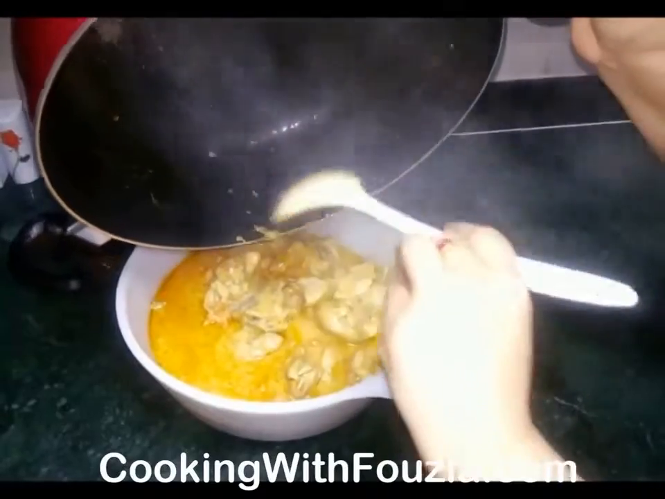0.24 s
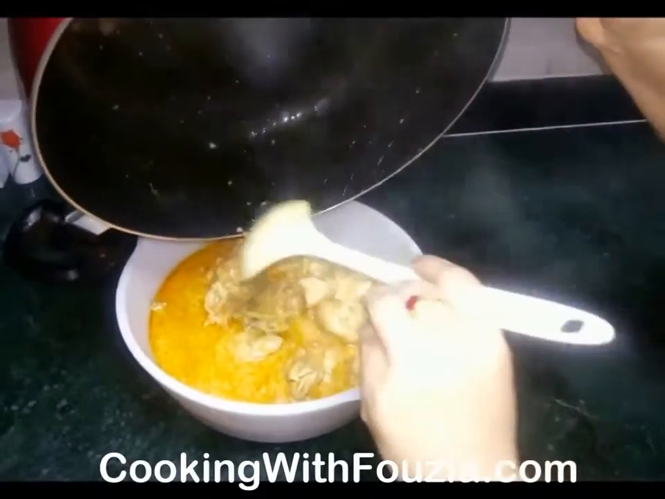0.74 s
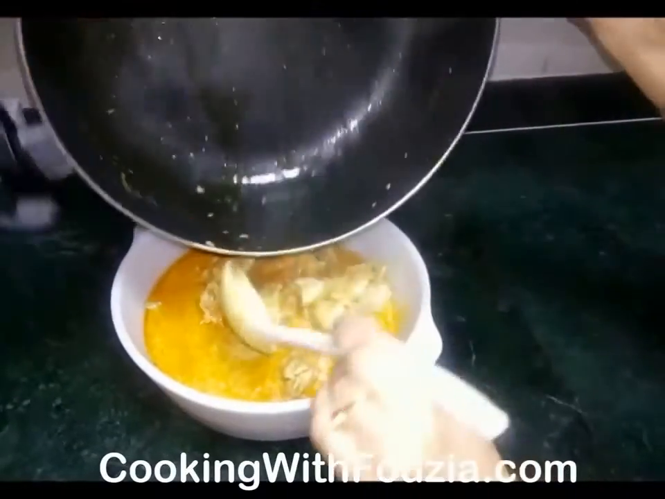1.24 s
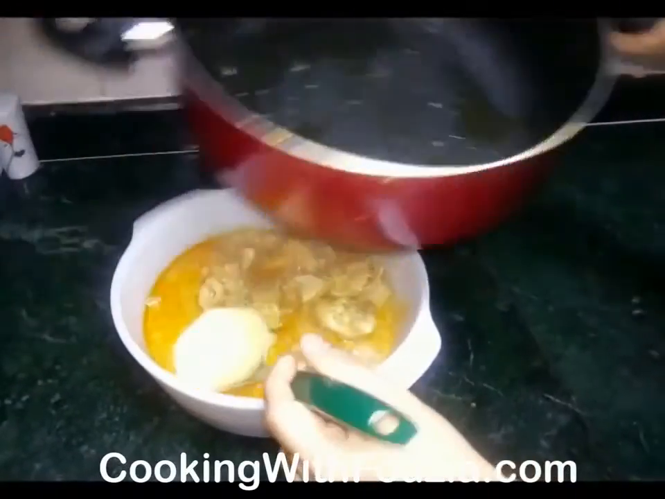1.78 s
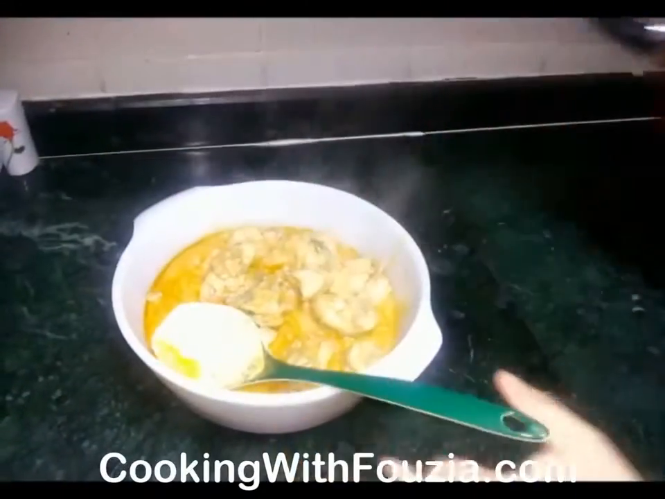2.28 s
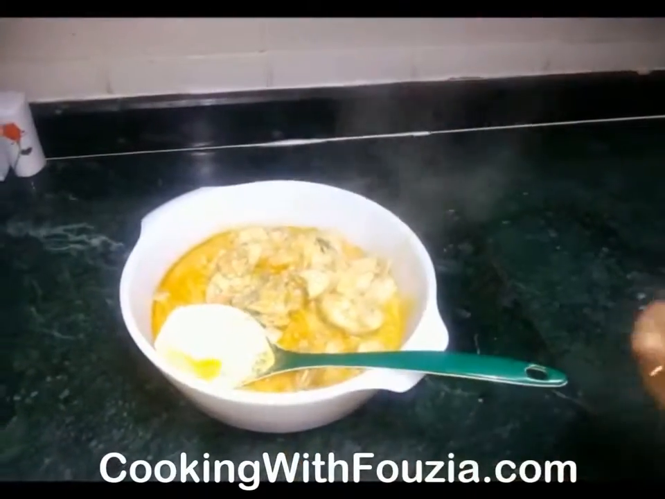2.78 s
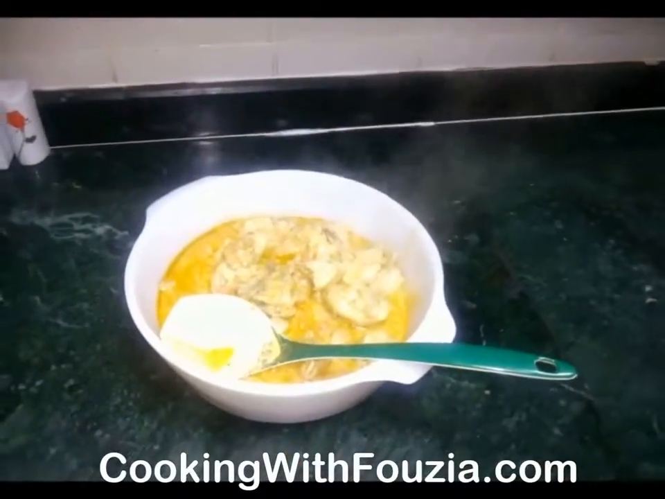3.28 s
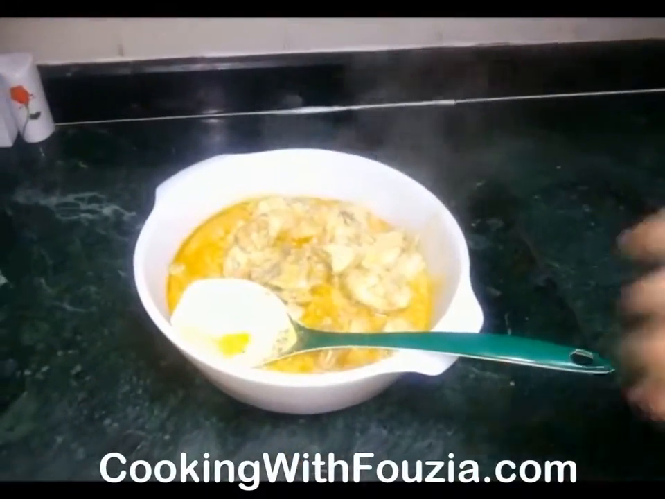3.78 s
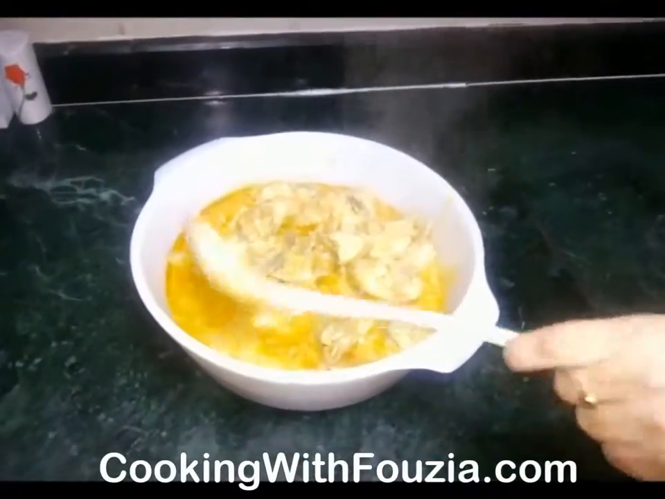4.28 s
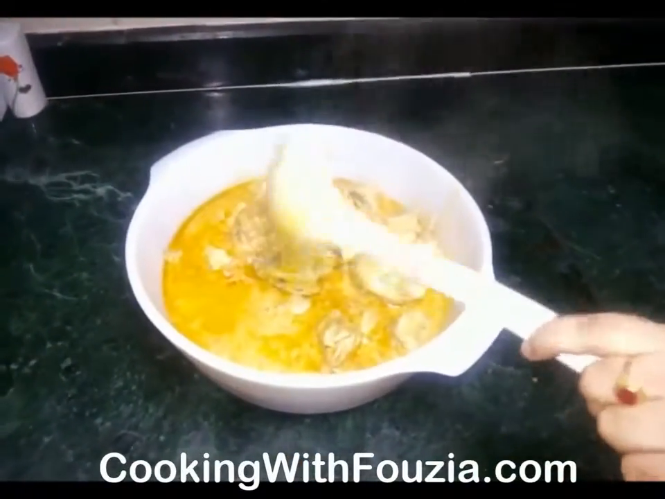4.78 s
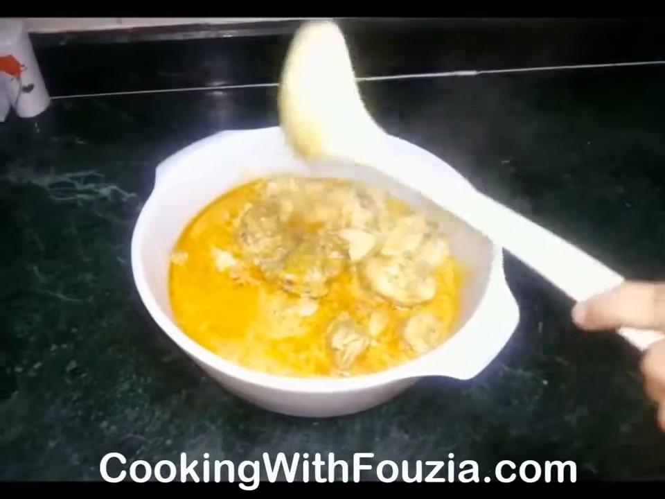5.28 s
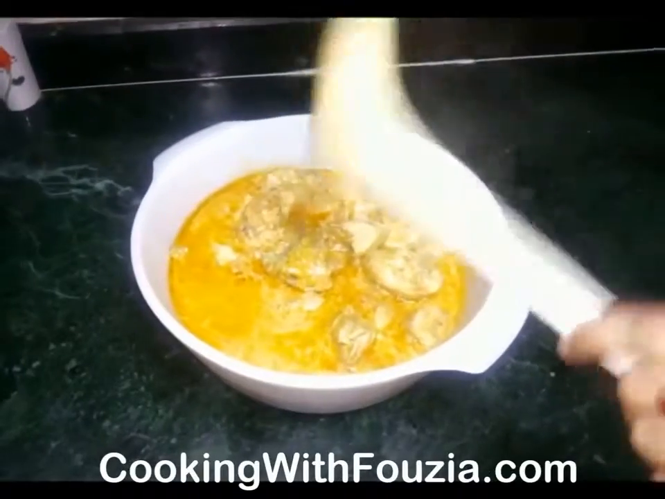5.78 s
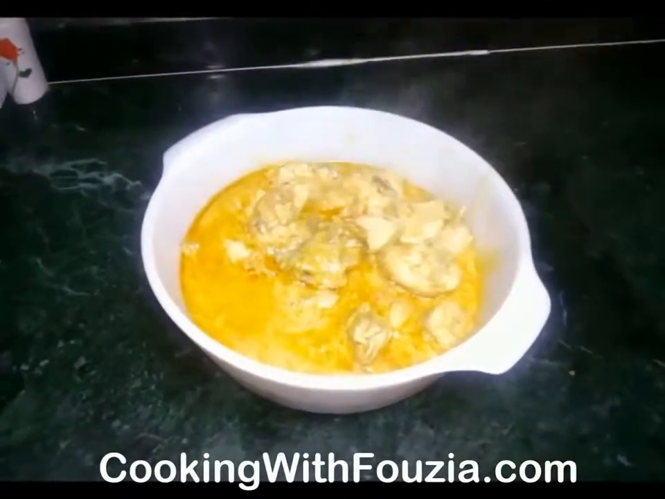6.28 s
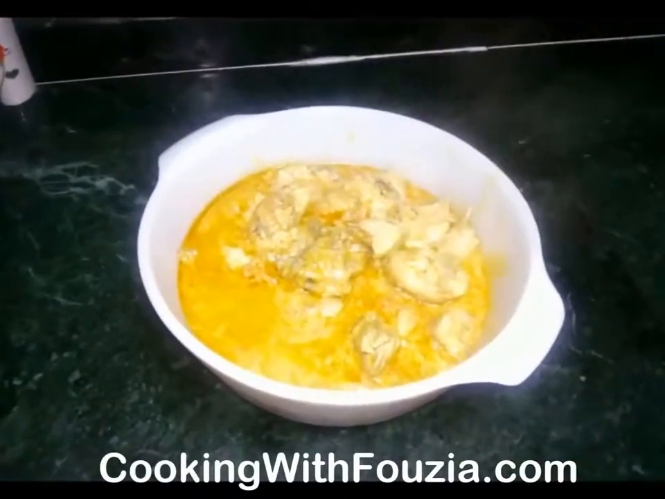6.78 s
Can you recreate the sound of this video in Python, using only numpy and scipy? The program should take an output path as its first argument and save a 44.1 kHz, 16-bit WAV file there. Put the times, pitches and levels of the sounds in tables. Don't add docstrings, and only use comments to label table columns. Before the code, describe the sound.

Close metallic kitchen knocks in a tiled room over a steady fan rush: pan scrape, loud blow, bowl rim clanks, dull thuds, final bright clatter.

```python
import sys
import numpy as np
from scipy import signal
from scipy.fft import rfft, irfft, next_fast_len
from scipy.io import wavfile
from scipy.ndimage import uniform_filter1d, map_coordinates

SR = 44100
rng = np.random.default_rng(int(sys.argv[2]) if len(sys.argv) > 2 else 0)


def generate_wav(sig):
    pcm = np.round(np.clip(np.atleast_2d(sig).T, -1, 1) * 32767).astype(np.int16)
    wavfile.write(sys.argv[1], SR, pcm)


def volts_from_db(level):
    exponent = np.asarray(level, float) / 20
    return 10 ** exponent


N = 310905

HUM_HZ = 767
BASS_HZ = 93
TOP_HZ = 15800
AIR_DB = -41.5

# f/Hz, level/dB (per Hz)
AIR = [(25, -21), (50, -27), (79, -16), (99, -10), (160, -8), (250, 0), (500, -2.5), (1000, -4),
       (1900, -9.5), (2400, -18.5), (5500, -26.5), (7200, -31.5), (12000, -28.5), (15700, -28.5)]
# t/s, level/dB
HUM = [(0, -45.5), (1.6, -53), (2.4, -43.5), (2.55, -42), (3, -48), (4.9, -45.5), (6.5, -44.5),
       (6.75, -46.5), (7.05, -61)]
# t/s, level/dB (over the rush)
SIZZLE = [(0, 30), (.4, 3), (1.7, 2.5), (2.1, 10), (3.2, 4), (3.6, 1.5), (5.5, 3), (6.3, 6.5), (7.05, 9.5)]
# f/Hz, t60/s
KITCHEN = [(150, 0.93), (450, 0.48), (2000, 0.41), (5000, 0.41), (10000, 0.29), (16000, 0.49)]
# t/s, level/dB
WALLS = [(0.01, 9), (0.018, 2), (0.03, -1.5), (0.044, -37)]

# t/s, level/dB (peak), hardness/dB, rise/s
SCRAPE = [
    (.001, -14, -1, 0.0011),
    (.016, -30.5, -5, 0.0035),
    (.033, -23, -9, 0.0038),
    (.052, -28, -13, 0.0064),
]
# t/s, level/dB, hardness/dB, rise/s
RUB = [
    (.072, -21.5, 0, 0.01),
    (.086, -32, 0, 0.0055),
    (.102, -27, 2, 0.0016),
    (.113, -23.5, 0.25, 0.0052),
    (.126, -31, 0.24, 0.0081),
]
# t/s, level/dB, hardness/dB, rise/s
SLIP_OFF = [
    (.142, -22, 1, .011),
    (.179, -32, 11, 0.0023),
]
# t/s, level/dB, hardness/dB, rise/s
STRIKE = [
    (.4655, -4, -8, 0.0016),
]
# t/s, level/dB, hardness/dB, rise/s
SHIVER = [
    (.489, -34, 1, 0.0035),
    (.504, -14.5, -1, 0.0015),
    (.521, -18, -1, 0.002),
    (.548, -25, 7, 0.0032),
]
# t/s, level/dB, hardness/dB, rise/s
TINK = [
    (1.012, -49, 0, 0.0017),
]
# t/s, level/dB, hardness/dB, rise/s
TICKS = [(1.83, -37.5, 23, 0.0023), (2.443, -41, 0, 0.0038), (2.585, -47, -1.5, 0.0013),
         (2.92, -47, -2, 0.021), (3.04, -55, 4, 0.0033), (3.44, -56, 8, 0.0027), (5.43, -54, -12, 0.0049),
         (5.535, -57, 5, .003), (5.635, -48, 2, 0.018), (5.75, -55, -4, 0.0054), (6.03, -67, -11, 0.011),
         (6.215, -41.5, -6, 0.0087)]
# t/s, level/dB, hardness/dB, rise/s
TOUCH = [
    (2.7665, -37, -6, 0.00029),
    (2.785, -49, 3, 0.0079),
]
# t/s, level/dB, hardness/dB, rise/s
KNOCK = [
    (1.1935, -13, -2.5, 0.0028),
    (1.204, -21, -7, 0.0039),
]
# t/s, level/dB, hardness/dB, rise/s
SET_DOWN = [
    (1.896, -23, 2, 0.0034),
    (1.906, -26, .3, 0.00095),
    (1.949, -42, .3, 0.0016),
]
# t/s, level/dB, hardness/dB, rise/s
ROCK = [
    (2.154, -28, 2, 0.0021),
    (2.179, -28.5, -2, 0.0014),
    (2.214, -53, -9, 0.002),
]
# t/s, level/dB, hardness/dB, rise/s
SETTLE = [
    (2.332, -26.5, -5, 0.0014),
    (2.346, -38, -4, 0.0038),
    (2.364, -32, -1, 0.0071),
    (2.389, -53, 5, 0.0033),
]
# t/s, level/dB, hardness/dB, rise/s
NUDGES = [
    (3.34, -40, 0.33, .019),
    (3.725, -36, .3, .008),
]
# t/s, level/dB, hardness/dB, rise/s
BUMP = [
    (3.879, -6.5, -3.5, 0.011),
]
# t/s, level/dB, hardness/dB, rise/s
DRAG = [
    (3.935, -19.5, -3.5, 0.009),
    (3.958, -13, 1.5, 0.013),
    (3.976, -20, 2.5, 0.0066),
    (3.995, -20.5, -5, 0.011),
    (4.2, -36.5, 33, 0.029),
    (4.25, -34, -2, 0.016),
]
# t/s, level/dB, hardness/dB, rise/s
CLINK = [
    (4.038, -11.5, 6.1, 0.011),
]
# t/s, level/dB, hardness/dB, rise/s
LIFT = [
    (4.093, -15, -5.5, 0.007),
    (4.110, -10.5, -4.5, 0.0083),
    (4.133, -20, -1, 0.0062),
    (4.147, -25.5, 4, 0.0043),
    (4.215, -28.5, -18, 0.01),
]
# t/s, level/dB, hardness/dB, rise/s
THUDS = [
    (4.306, -22, -1.5, 0.0028),
    (4.325, -26.5, -11, 0.0029),
]
# t/s, level/dB, hardness/dB, rise/s
THUMP = [
    (4.369, -21, -15, 0.014),
    (4.45, -32, -16, 0.0072),
]
# t/s, level/dB, hardness/dB, rise/s
TAP = [
    (4.527, -25.5, 8.2, 0.002),
    (4.538, -25, 3.3, 0.0062),
    (4.58, -49, 6, 0.004),
]
# t/s, level/dB, hardness/dB, rise/s
LAST_TAPS = [
    (4.713, -26.5, 2, 0.014),
    (4.755, -29.5, -8, 0.0059),
    (4.812, -31.5, -10, 0.0071),
]
# t/s, level/dB, hardness/dB, rise/s
CLATTER = [
    (6.8775, -5, 4.7, 0.0013),
]
# t/s, level/dB, hardness/dB, rise/s
RATTLE = [
    (6.892, -20, 12, 0.0026),
    (6.906, -22, 16, 0.0032),
    (6.928, -26, -1, 0.0024),
    (6.938, -19.5, 8, 0.0017),
]
# t/s, level/dB, hardness/dB, rise/s
REBOUND = [
    (6.918, -12.5, 2, 0.0036),
    (6.934, -27, -9, 0.0029),
    (6.947, -29, -12, 0.0028),
    (6.995, -31, -2, 0.005),
]

# f/Hz, level/dB, t60/s
SCRAPE_MODES = [(473, 7, 0.39), (770, -11, 0.33), (1145, -4.5, 0.5), (1336, 2, 0.11), (1560, 15, 0.053),
                (1860, 8, 0.13), (2260, 5, 0.093), (2600, -4.5, 0.39), (3413, -26, 0.3), (4420, 2, 0.2),
                (4694, -2, 0.34), (5400, 0, 0.29), (5740, -2, 0.22), (6100, -2, 0.13), (6842, -5, 0.14),
                (8300, -21, 0.18)]
# f/Hz, level/dB, t60/s
RUB_MODES = [(970, -3, 0.21), (1144, -7, 0.36), (1720, 2, 0.093), (1833, 9, 0.098), (2350, -3, 0.11),
             (3470, -18, 0.28), (4180, -16, .2), (5276, -17, 0.24), (5787, -30, 0.16), (6500, -16, .15)]
# f/Hz, level/dB, t60/s
SLIP_OFF_MODES = [ (466, 5, 0.69), (1146, -3, 0.62), (1770, 2, 0.22), (2584, -10, 0.4), (3326, -0.5, 0.19),
                  (4130, -8, 0.53), (4500, -2, 0.2), (4740, -21, .25), (5640, -21, 0.28), (6400, -16, 0.33),
                  (8150, -12, 0.11)]
# f/Hz, level/dB, t60/s
STRIKE_MODES = [(474, -16, .45), (781, -3, .45), (355, -8, .12), (1148.5, -5, 1.5), (1369, -6, .6),
                (1755, -16, .3), (1860, -12, .3), (1300, -1, .06), (1965, 11, .045), (1947, -10, .35),
                (2250, -16, .3), (2764, -9, .4), (4595, -9, .25), (5840, -10, .3), (2335, -10, .1),
                (2638, -12, .25), (2820, -7, .4), (3445, -6, .22), (4075, -7, .3), (4382, -9, .36),
                (4545, -7, .34), (4877, -11, .28), (5033, -11, .36), (5200, -10, .36), (5400, -12, .3),
                (5776, -6, .25), (6272, -12, .23), (6815, -9, .18), (7752, -22, .25), (8134, -25, .25)]
# f/Hz, level/dB, t60/s
SHIVER_MODES = [(470.3, -2, 0.49), (756, 6.5, 0.19), (1148.5, -13, 0.4), (1327, 3, 0.26), (1352, 6.5, 0.41),
                (1720, 6, 0.17), (1900, 6.5, 0.18), (2320, -15, 0.43), (2800, -4, 0.46), (4000, -16, 0.26),
                (4500, 0, 0.31), (5210, -4, 0.33), (5800, -12, 0.18), (6800, -23, 0.12)]
# f/Hz, level/dB, t60/s
TICK_MODES = [ (5900, -1, .1), (6900, -1, 0.17), (7600, -3, .2), (8400, -3, 0.093)]
# f/Hz, level/dB, t60/s
TOUCH_MODES = [(1825, 11, 0.033), (2050, -13, 0.091), (4180, -11, .08), (4750, -6, .1), (5500, -4, .1)]
# f/Hz, level/dB, t60/s
KNOCK_MODES = [(364, -11, .18), (402, 2, .085), (451, -19, .3), (474, 0, .34), (490, -13, .22),
               (778, -16, .36), (1369, -8, .6), (1914, -12, .1), (2595, -25, .3), (2756, -29, .35),
               (2828, -16, .33), (2850, -15, .1), (3865, -15, .22), (4356, -13, .25), (4694, -18, .3),
               (4890, -18, .2), (5044, -16, .32), (5399, -17, .25), (4379, -14, .08), (5481, -22, .3),
               (5690, -25, .3), (6826, -22, .28), (7462, -17, .28), (7693, -28, .2), (9281, -29, .2),
               (9512, -28, .13)]
# f/Hz, level/dB, t60/s
SET_DOWN_MODES = [(467, 0, 0.13), (620, 0.5, 0.066), (1070, -10, .3), (1112, -12.5, 1), (1660, 1, 0.12),
                  (2045, 7, 0.075), (2720, 5, 0.084), (2980, -16, 0.41), (3120, 7.5, 0.06),
                  (4920, -4, 0.075)]
# f/Hz, level/dB, t60/s
ROCK_MODES = [(464, 0, 0.16), (1097, -3.5, 0.48), (1176, 7, 0.076), (1140, -5, .3), (1225, 1, 0.11),
              (2100, -3, 0.15), (3186, 0.5, 0.25), (5420, -8, 0.11), (6800, -33, .15)]
# f/Hz, level/dB, t60/s
SETTLE_MODES = [(455, -5.5, 0.13), (1620, 5, 0.069), (1913, -1.5, 1), (2950, 4.5, 0.091), (3100, -13, 0.16),
                (3930, -2, 0.1), (4500, -8, .1)]
# f/Hz, level/dB, t60/s
NUDGE_MODES = [(432, 5, 0.1), (1160, -19, 0.11)]
# f/Hz, level/dB, t60/s
BUMP_MODES = [(464, 10.5, 0.17), (790, -1, 0.2), (1145, -1, 0.5), (1450, -4, 0.28), (1670, -9, 0.17),
              (1870, -8, 0.36), (1940, -3, 0.27), (2611, -20, 0.13), (3000, -4, 0.13), (3500, -10, 0.14),
              (3850, -7, 0.13), (4867, -14, 0.1)]
# f/Hz, level/dB, t60/s
DRAG_MODES = [(1930, -1.5, 0.18), (2440, -11, 0.086), (2907, -0.5, 0.17), (3445, -4, 0.13),
              (3600, 0.5, 0.14), (4900, -7, .1), (5600, -2, 0.06), (6340, -25, 0.085)]
# f/Hz, level/dB, t60/s
CLINK_MODES = [(1730, -2, 0.24), (2740, -4.5, 0.11), (3280, 7, 0.056), (5030, 2, 0.069), (5500, -10, 0.15),
               (5940, -18.5, 0.27), (6300, -19, 0.13), (8080, -23, 0.054)]
# f/Hz, level/dB, t60/s
DAMPED_RIM_MODES = [(463, 8.5, 0.065), (773, 12, 0.05), (870, -2, 0.15), (1556, -14, 0.73), (1940, 0, 0.11),
                    (2180, -7, 0.19), (3100, 3, 0.047), (3370, 2, 0.15), (4770, -9, 0.2)]
# f/Hz, level/dB, t60/s
THUD_MODES = [(327, -10, 0.13), (479, -6, .1), (1104, -9.5, 0.14), (1608, 11, 0.029), (2130, 0, 0.05),
              (2500, -15, .1), (2960, -14, .2), (3250, -7, 0.088), (3740, 4, 0.038), (4670, -6, 0.076)]
# f/Hz, level/dB, t60/s
THUMP_MODES = [(513, -5, 0.098), (873, 6, 0.054), (1072, -14, 0.14), (1460, -14, 0.087), (2070, -5, 0.079),
               (3000, -18, 0.13)]
# f/Hz, level/dB, t60/s
TAP_MODES = [(319, 5.5, 0.082), (596, 4, 0.067), (747, 2, 0.15), (1152, 1, 0.16), (2080, 0, 0.057),
             (2590, -6, 0.13), (3084, -11, 0.079), (3900, -20, 0.11), (4700, -21, 0.08)]
# f/Hz, level/dB, t60/s
LAST_MODES = [(527.5, 4.5, 0.098), (760, -6.5, 0.26), (1115, -5.5, 0.12), (1770, -8, 0.068),
              (1930, -8, 0.069), (2480, -9, .1), (3040, -12, 0.11), (3440, -11, 0.13)]
# f/Hz, level/dB, t60/s
CLATTER_MODES = [(1362, -11, .2), (1486, -9, .2), (1583, -6, .2), (1809, -5, .2), (1970, 5, .1),
                 (2182, 4, .1), (2826, -14, .2), (3838, -14, .2), (5319, -5, .1), (5593, -5, .16),
                 (6228, -7, .14), (7775, -21, .5), (5900, -6, .1), (9302, -26, .15), (12186, -19, .25),
                 (12130, -21, .2), (13096, -28, .15)]
# f/Hz, level/dB, t60/s
REBOUND_MODES = [(1340, -2, 0.16), (1420, -17, 0.1), (1550, 1, 0.12), (1795, 0, 0.11), (1806, 6, 0.076),
                 (1950, -6, 0.14), (2980, -13, .15), (5100, -17, 0.18), (5700, -4, .15), (7775, -15, 0.32),
                 (6228, -10, .2)]

# f/Hz, level/dB (per Hz)
SCRAPE_TONE = [(59, -89), (100, -67), (378, -21.5), (467, -18), (697, -17.5), (1840, -8), (2870, -25),
               (5170, -17.5), (15500, -56)]
# f/Hz, level/dB (per Hz)
STRIKE_TONE = [(60, -33), (200, -55), (450, -7), (1000, -14), (1750, -4.5), (2300, -5.5), (2900, -12.5),
               (4500, -9.5), (6200, -12.5), (8000, -22.5), (15500, -49)]
# f/Hz, level/dB (per Hz)
TICK_TONE = [(500, -38), (1300, -2), (2000, 1.5), (3200, 2), (5000, 5.5), (7500, -0.5), (11000, -8.5),
             (15500, -32)]
# f/Hz, level/dB (per Hz)
KNOCK_TONE = [(100, -68), (250, -10), (400, -14), (600, -23), (1900, -11.5), (3000, -15), (7500, -16.5),
              (15500, -36)]
# f/Hz, level/dB (per Hz)
FAR_TONE = [(120, -41), (300, -14), (600, -3), (1500, 3.5), (3000, 0.5), (6000, -5), (8000, -20.5),
            (15500, -32)]
# f/Hz, level/dB (per Hz)
LIFT_TONE = [(50, -57), (110, -14.5), (300, -4.5), (460, -5), (1100, -5), (2000, -7), (5000, -11),
             (6600, -16.5), (7400, -24), (10000, -31), (15500, -50)]
# f/Hz, level/dB (per Hz)
THUD_TONE = [(50, -22), (150, -4), (500, 4.5), (900, -2), (2000, -3), (4000, -13), (6200, -23), (7500, -37),
             (15500, -52)]
# f/Hz, level/dB (per Hz)
CLATTER_TONE = [(100, -73), (330, -14), (1100, -12), (1500, 0), (2100, -1.5), (2600, -8), (3400, -12),
                (5700, -12), (6700, -16.5), (9000, -19), (10500, -30), (15500, -35)]


def unit(x):
    return x / np.sqrt(np.mean(x ** 2) + 1e-20)


def along(points, hz):
    f, v = np.transpose(points)
    return np.interp(np.log(hz + 1), np.log(f + 1), v)


def curve(rows):
    s, value = np.transpose(rows)
    return np.interp(np.arange(N) / SR, s, value)


def wobble(rate):
    knots = rng.standard_normal(int(N * rate / SR) + 4)
    return map_coordinates(knots, [np.arange(N) * rate / SR])


def coloured(size, gain_db):
    m = next_fast_len(size + 4096)
    spectrum = rfft(rng.standard_normal(m)) * volts_from_db(gain_db(np.fft.rfftfreq(m, 1 / SR)))
    return unit(irfft(spectrum, m)[:size])


def burst(envelope, gain_db):
    size = len(envelope)
    z = rfft(envelope * rng.standard_normal(size))
    z = z / np.sqrt(abs(z) ** 2 + .15 * np.mean(abs(z) ** 2))
    return irfft(z * volts_from_db(gain_db(np.fft.rfftfreq(size, 1 / SR))), size)


def filtered_band(x, lo_hz, hi_hz):
    return signal.sosfiltfilt(signal.butter(2, [lo_hz, hi_hz], "bandpass", fs=SR, output="sos"), x)


def kitchen(size):
    hz, t = np.fft.rfftfreq(256, 1 / SR), np.arange(size // 128 + 1) * 128 / SR
    z = rng.standard_normal((len(hz), len(t))) + 1j * rng.standard_normal((len(hz), len(t)))
    decay = volts_from_db(-60 * t / along(KITCHEN, hz)[:, None])
    tail = signal.istft(z * decay, SR, nperseg=256)[1][:size]
    tail = tail * (1 - np.exp(-np.arange(size) / SR / 0.002))
    tail /= np.linalg.norm(tail)
    for s, db in WALLS:
        tail[round(s * SR)] += volts_from_db(db - 17.5)
    return tail


def contacts(rows, modes, tone, ring_db, lean, wet_db, ring_wet_db, damping=0.93, pivot_hz=1500,
             held_s=99, held_t60=0.055, sliding=False):
    size = 28672
    out, t = np.zeros(N + size), np.arange(size) / SR
    mode_hz, mode_db, t60 = np.transpose(modes)
    bank = volts_from_db(-60 * t / (damping * t60[:, None])) * np.exp(2j * np.pi * mode_hz[:, None] * t)
    pair = rng.random((len(modes), 2))
    beat = np.cos(2 * np.pi * ((6 + 22 * pair[:, :1]) * t + pair[:, 1:]))
    bank = bank * (1 + np.minimum(0.25, mode_hz[:, None] / 12000) * beat)
    fade = np.minimum(1, (size - np.arange(size)) / 4096)
    for s, db, hard_db, rise in rows:
        u = t / max(rise, 3e-4)
        tilt = [(pivot_hz / 5, -lean * hard_db), (pivot_hz, 0), (min(pivot_hz * 4, 9000), hard_db)]
        puff = burst((u * np.exp(1 - u)) ** 2, lambda hz: along(tone, hz) + along(tilt, hz))
        crack = np.minimum(1, 2 * u) * puff
        in_step = np.exp(2j * np.pi * mode_hz * round(s * SR) / SR * (not sliding))
        strength = volts_from_db(mode_db + along(tilt, mode_hz) + rng.normal(0, 1.2, len(modes)))
        onset = 1 - (1 + 2 * u) * np.exp(-2 * u)
        ring = (strength * in_step @ bank).imag * onset
        ring = ring * volts_from_db(-60 * np.maximum(s + t - held_s, 0) / held_t60)
        crack = crack / np.linalg.norm(crack)
        ring = volts_from_db(ring_db) * ring / np.linalg.norm(ring)
        sent = volts_from_db(wet_db) * crack + volts_from_db(ring_wet_db) * ring
        echo = signal.fftconvolve(sent, kitchen(size))[:size]
        hit = (crack + ring + echo) * fade
        loudest = np.sqrt(uniform_filter1d(hit ** 2, size=400).max())
        out[round(s * SR):][:size] += volts_from_db(db) * hit / loudest
    return out[:N]


def room_tone():
    rush = coloured(N, lambda hz: along(AIR, hz))
    sizzle = filtered_band(rush, lo_hz=2700, hi_hz=8700) * (volts_from_db(curve(SIZZLE)) - 1)
    whine_hz = HUM_HZ + 2.253 * wobble(6)
    whine = np.sin(2 * np.pi * np.cumsum(whine_hz) / SR) * volts_from_db(curve(HUM) + 0.33 * wobble(14))
    return volts_from_db(AIR_DB - 1.48 + 0.7 * wobble(8.1)) * (rush + sizzle) + whine


def pan_scrape():
    scrape = contacts(SCRAPE, SCRAPE_MODES, SCRAPE_TONE, ring_db=4.5, lean=0.98, wet_db=3, ring_wet_db=-16,
                      held_s=0.082, held_t60=.05)
    rub = contacts(RUB, RUB_MODES, SCRAPE_TONE, ring_db=6.0, lean=.9, wet_db=10.5, ring_wet_db=-6)
    slip_off = contacts(SLIP_OFF, SLIP_OFF_MODES, SCRAPE_TONE, ring_db=5.0, lean=1.5, wet_db=-2.0,
                        ring_wet_db=-17, held_s=.262, held_t60=.2)
    return scrape + rub + slip_off


def pan_strike():
    strike = contacts(STRIKE, STRIKE_MODES, STRIKE_TONE, ring_db=1.0, lean=-1.4, wet_db=1.5, ring_wet_db=-8,
                      damping=0.75)
    shiver = contacts(SHIVER, SHIVER_MODES, STRIKE_TONE, ring_db=3.5, lean=0.35, wet_db=2.0, ring_wet_db=-8)
    return strike + shiver


def light_ticks():
    tink = contacts(TINK, TICK_MODES, TICK_TONE, ring_db=0.0, lean=-1.2, wet_db=4.0, ring_wet_db=-13.0,
                    pivot_hz=4500)
    ticks = contacts(TICKS, TICK_MODES, TICK_TONE, ring_db=-30, lean=0.95, wet_db=2.5, ring_wet_db=-13.0,
                     pivot_hz=4530)
    lid = contacts(TOUCH, TOUCH_MODES, TICK_TONE, ring_db=7.0, lean=.3, wet_db=7.0, ring_wet_db=-1.0,
                   pivot_hz=3000)
    return tink + ticks + lid


def pan_knock():
    return contacts(KNOCK, KNOCK_MODES, KNOCK_TONE, ring_db=13, lean=1.2, wet_db=0, ring_wet_db=-18, damping=1.0)


def pan_on_stand():
    landing = contacts(SET_DOWN, SET_DOWN_MODES, FAR_TONE, ring_db=7.0, lean=-1.9, wet_db=4.0, ring_wet_db=-2.0,
                       damping=0.31, held_s=2.6)
    rocking = contacts(ROCK, ROCK_MODES, FAR_TONE, ring_db=9, lean=.2, wet_db=7, ring_wet_db=-2,
                       damping=0.8, held_s=2.25, held_t60=.05)
    touch = contacts(SETTLE[:1], SETTLE_MODES, FAR_TONE, ring_db=6.5, lean=-.4, wet_db=8, ring_wet_db=-17.0,
                     damping=0.45, held_s=2.43)
    settling = contacts(SETTLE[1:], SETTLE_MODES, FAR_TONE, ring_db=12, lean=1.2, wet_db=10.5, ring_wet_db=-14,
                        damping=1.6, held_s=2.43, held_t60=.06)
    return landing + rocking + touch + settling


def ladle_from_bowl():
    nudges = contacts(NUDGES, NUDGE_MODES, THUD_TONE, ring_db=25, lean=.1, wet_db=-3, ring_wet_db=-14)
    bump = contacts(BUMP, BUMP_MODES, LIFT_TONE, ring_db=6.5, lean=-0.88, wet_db=3.0, ring_wet_db=-8)
    drag = contacts(DRAG, DRAG_MODES, LIFT_TONE, ring_db=-4.0, lean=2.5, wet_db=1.1, ring_wet_db=-4.0, sliding=True)
    clink = contacts(CLINK, CLINK_MODES, LIFT_TONE, ring_db=-1.0, lean=2.6, wet_db=3.0, ring_wet_db=-2.0)
    lift = contacts(LIFT, DAMPED_RIM_MODES, LIFT_TONE, ring_db=3, lean=1.0, wet_db=2.0, ring_wet_db=-3,
                    damping=0.42, sliding=True)
    return nudges + bump + drag + clink + lift


def thuds():
    first = contacts(THUDS, THUD_MODES, FAR_TONE, ring_db=6, lean=0.25, wet_db=5.5, ring_wet_db=-1.0)
    soft = contacts(THUMP, THUMP_MODES, THUD_TONE, ring_db=-1, lean=0.16, wet_db=-1.5, ring_wet_db=0.0)
    tap = contacts(TAP, TAP_MODES, THUD_TONE, ring_db=0.5, lean=0.33, wet_db=2.5, ring_wet_db=1.5)
    last = contacts(LAST_TAPS, LAST_MODES, THUD_TONE, ring_db=-1, lean=0.36, wet_db=0.0, ring_wet_db=1.0,
                    sliding=True)
    return first + soft + tap + last


def ladle_on_tray():
    clatter = contacts(CLATTER, CLATTER_MODES, CLATTER_TONE, ring_db=6.5, lean=.1, wet_db=7.0, ring_wet_db=-18,
                       damping=0.62)
    rattle = contacts(RATTLE, CLATTER_MODES, CLATTER_TONE, ring_db=-16, lean=0.79, wet_db=5.5, ring_wet_db=-12.0)
    rebound = contacts(REBOUND, REBOUND_MODES, CLATTER_TONE, ring_db=5, lean=-0.47, wet_db=7.5, ring_wet_db=-3.0)
    return clatter + rattle + rebound


def scene():
    hits = pan_scrape() + pan_strike() + light_ticks() + pan_knock() + pan_on_stand()
    hits = hits + ladle_from_bowl() + thuds() + ladle_on_tray()
    hits = signal.sosfilt(signal.butter(2, BASS_HZ, "highpass", fs=SR, output="sos"), hits)
    return (room_tone() + hits)[None]


def band_limit(x):
    return signal.sosfilt(signal.butter(12, 15800, fs=SR, output="sos"), x)


def record(dry):
    x = dry / (1 + np.abs(dry) ** 12) ** (1 / 12)
    x = x - 0.014 * x ** 4
    x = irfft(rfft(x) * (np.fft.rfftfreq(N, 1 / SR) < TOP_HZ), N)
    return band_limit(x)


dry = scene()
out = record(dry)
generate_wav(out)
```